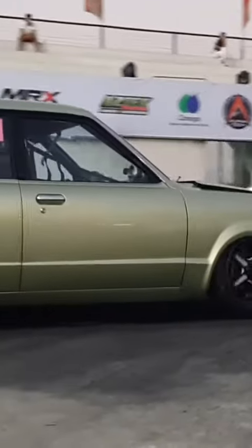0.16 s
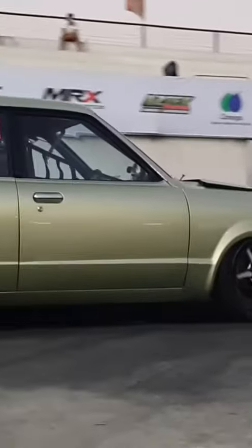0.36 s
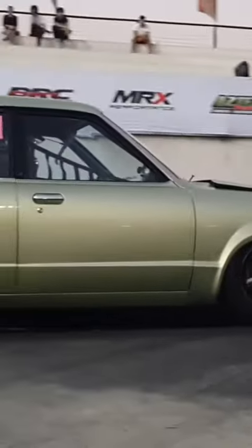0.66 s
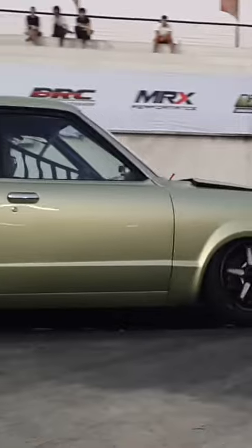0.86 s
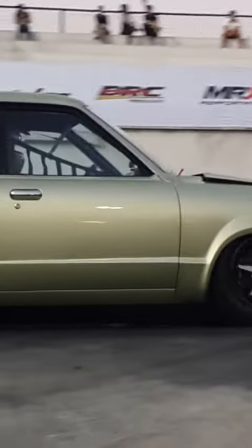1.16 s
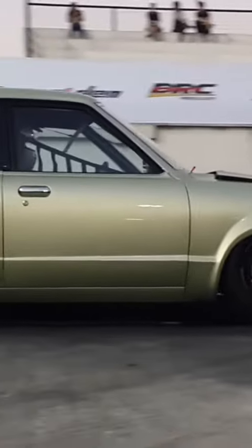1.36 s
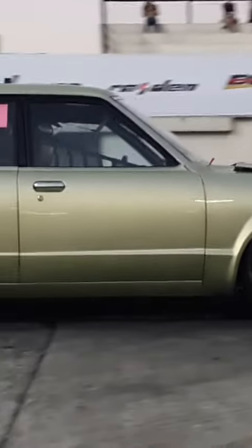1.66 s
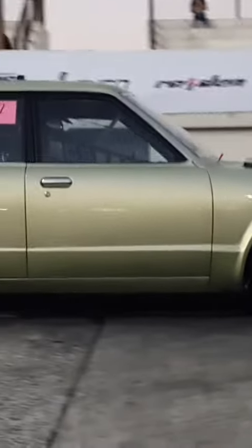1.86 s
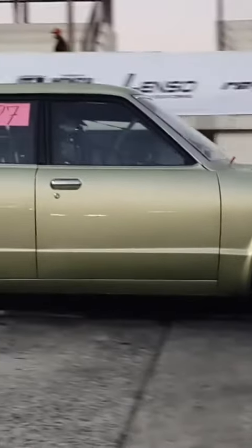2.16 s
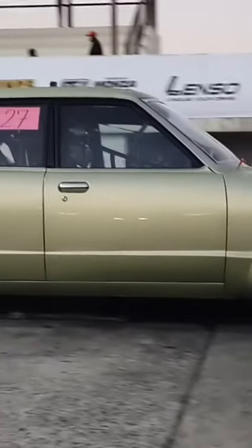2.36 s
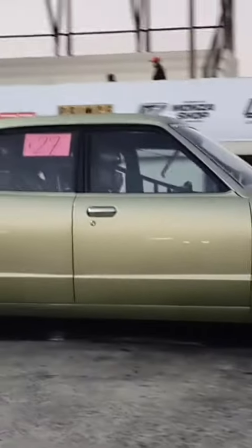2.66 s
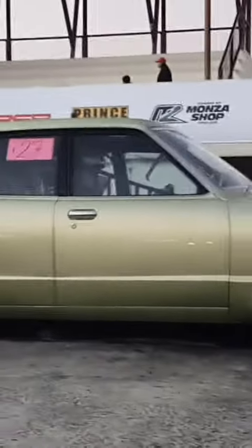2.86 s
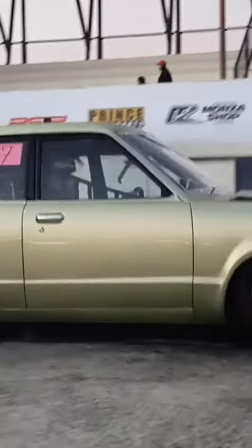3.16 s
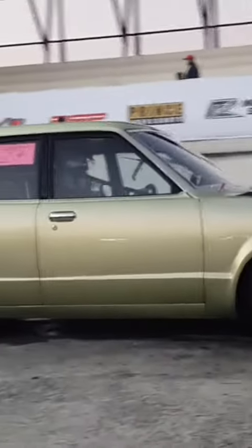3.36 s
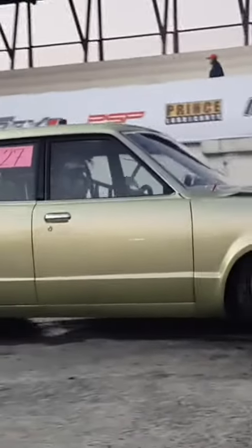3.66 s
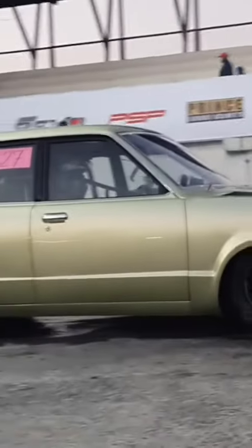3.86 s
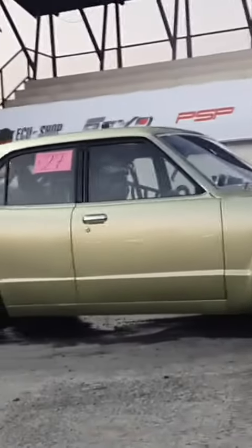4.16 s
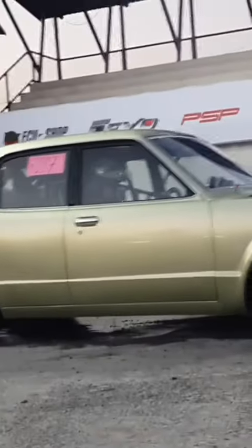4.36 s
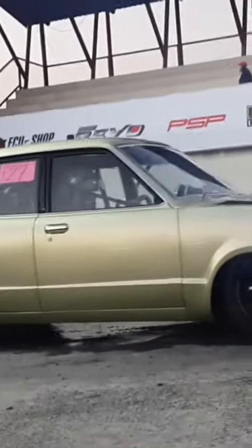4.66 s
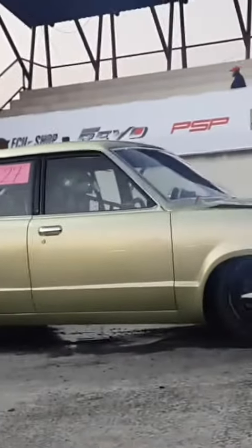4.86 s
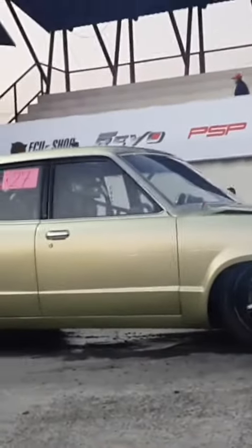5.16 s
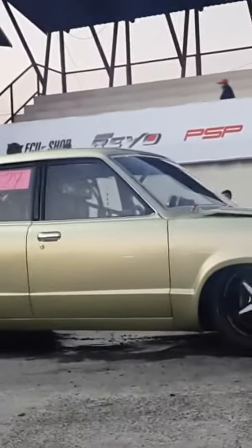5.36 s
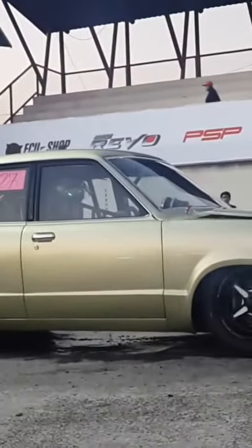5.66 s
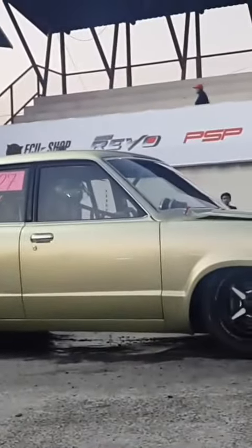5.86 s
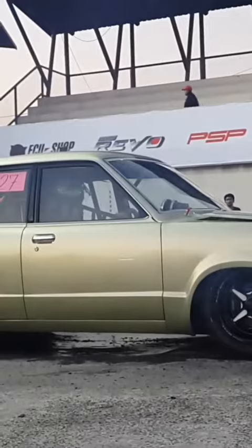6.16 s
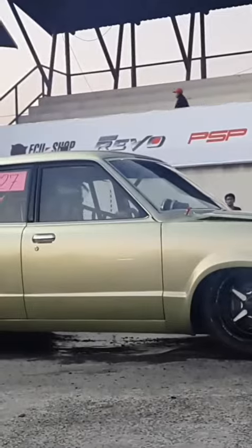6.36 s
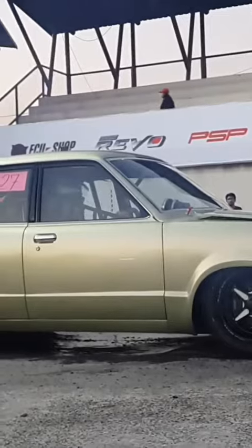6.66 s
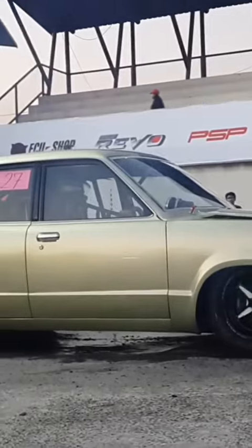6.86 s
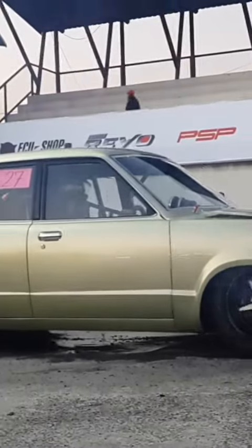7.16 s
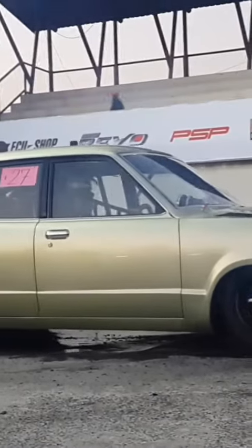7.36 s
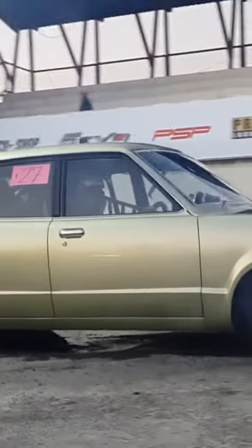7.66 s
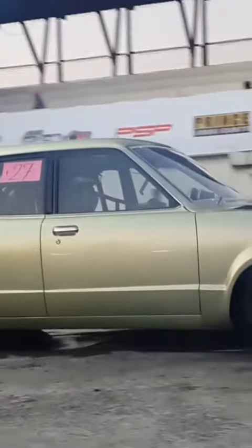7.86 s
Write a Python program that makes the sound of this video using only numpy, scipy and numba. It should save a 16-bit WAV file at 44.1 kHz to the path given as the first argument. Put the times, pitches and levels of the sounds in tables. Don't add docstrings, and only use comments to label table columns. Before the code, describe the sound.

A lumpy rotary race engine idles in pulsing bursts of hissy pops, stutters faster mid-way, then gets three sharp throttle blips near the end.

```python
import sys
import numpy as np
from scipy import signal
from scipy.fft import rfft, irfft, next_fast_len
from scipy.io import wavfile
from scipy.ndimage import uniform_filter1d, map_coordinates
from numba import njit

SR = 44100
rng = np.random.default_rng(int(sys.argv[2]) if len(sys.argv) > 2 else 0)


def gain_from_decibels(decibels):
    exponent = np.asarray(decibels, float) / 20
    return 10 ** exponent


def to_wav(sig):
    pcm = np.clip(np.atleast_2d(sig), -1, 1) * 32767
    pcm = np.round(pcm).astype(np.int16)
    wavfile.write(sys.argv[1], SR, pcm.T)


N = 352797
IDLE_HZ = 54


def colour(x, points):
    hz, db = np.transpose(points)
    f = np.maximum(np.arange(len(x) // 2 + 1) * SR / len(x), 1)
    gain = gain_from_decibels(np.interp(np.log(f), np.log(hz), db, left=-90, right=-90))
    return irfft(rfft(x) * gain, len(x))


def noise(points):
    x = colour(rng.standard_normal(next_fast_len(N)), points)[:N]
    return x / np.std(x)


def clicks(s, size):
    at = np.clip(s * SR, 0, N)
    i = at.astype(int)
    early = np.bincount(i, size * (1 - at + i), N + 2)
    late = np.bincount(i + 1, size * (at - i), N + 2)
    return (early + late)[:N]


def swell(x, rise_s, fall_s):
    t = np.arange(int(8 * fall_s * SR)) / SR
    shape = (1 - np.exp(-t / rise_s)) ** 2 * np.exp(-t / fall_s)
    return signal.fftconvolve(x, shape / shape.max())[:N]


def bump(x, width_ms):
    t = np.arange(-200, 201) / SR
    return signal.fftconvolve(x, np.exp(-.5 * (1000 * t / width_ms) ** 2), mode="same")


@njit
def ring(x, hz, t60):
    y, z, r = np.empty(len(x)), 0j, np.exp(-np.log(1000) / (t60 * SR))
    for i in range(len(x)):
        z = z * r * np.exp(2j * np.pi * hz[i] / SR) + x[i]
        y[i] = z.imag
    return y


@njit
def follow(x, attack, release):
    y, e = np.empty(len(x)), .1
    for i in range(len(x)):
        e += (x[i] - e) * (attack if x[i] > e else release)
        y[i] = e
    return y


def track():
    # frequency in Hz, level in dB per Hz.
    murmur = [(20, -30), (60, -8.5), (200, 0), (600, -20), (1300, -18), (2400, -26), (3500, -35.5),
              (7000, -28), (12000, -34.5), (13400, -41)]
    sway = gain_from_decibels(4.6 * noise([(.5, -11), (8, -13.5), (30, 7)]))
    mid = noise(murmur)
    side = colour(np.r_[noise(murmur), 0], [(20, -59), (500, -50), (2000, 3.0), (14000, 2.0)])[:N]
    return gain_from_decibels(-33.5) * sway * np.array([mid + side, mid - side])


def wind():
    return gain_from_decibels(-49.0) * np.array([noise([(15, 12), (40, 14.0), (120, -37.0), (300, -30)]) for _ in range(2)])


def octaves(s):
    return np.log2(np.maximum(1 / np.gradient(s) / IDLE_HZ, 1))


def chambers():
    # first firing in seconds, lone firings before, run, lone firings after, chambers of rest.
    lope = [(0.0115, 0, 0, 0, 1), (0.0318, 0, 6, 0, 6), (0.2664, 0, 6, 0, 6), (0.4996, 0, 5, 0, 7),
            (0.7368, 0, 6, 0, 6), (0.9696, 0, 6, 0, 6), (1.1933, 1, 4, 1, 4), (1.4105, 1, 6, 0, 7),
            (1.6789, 0, 2, 0, 1), (1.7342, 0, 3, 0, 6), (1.8955, 1, 4, 0, 6), (2.1192, 0, 6, 0, 8),
            (2.3734, 0, 6, 0, 7), (2.6024, 1, 2, 2, 4), (4.5138, 1, 4, 1, 4), (4.733, 1, 5, 0, 6),
            (4.9624, 2, 2, 2, 4), (5.2195, 1, 3, 1, 6), (5.4589, 1, 2, 1, 6), (5.6853, 0, 4, 1, 6),
            (5.9069, 1, 2, 2, 6), (6.1681, 1, 4, 1, 8), (6.4632, 0, 6, 0, 7)]
    stutter = [(2.815, 2, 2, 2, 2), (3.0344, 3, 2, 2, 2), (3.2899, 1, 1, 0, 2), (3.3798, 2, 2, 2, 2),
               (3.5961, 2, 2, 2, 2), (3.8115, 1, 1, 0, 2), (3.9005, 2, 2, 2, 2), (4.1191, 2, 1, 0, 2),
               (4.2507, 2, 2, 2, 4)]
    blips = [
        (6.6942, 0, 9, 0, 0),
        (6.84, 0, 10, 0, 15),
        (7.1902, 1, 9, 0, 0),
        (7.3665, 0, 11, 0, 16),
        (7.7182, 0, 9, 0, 0),
        (7.8484, 0, 13, 0, 0),
        (7.9966, 0, 1, 0, 0),
    ]
    beats = sorted(lope + stutter + blips)
    bars = []
    for _, lone_before, run, lone_after, rest in beats:
        bars.append([1, 0] * lone_before + [1] * run + [0, 1] * lone_after + [0] * rest)
    lit = np.concatenate(bars).astype(bool)
    first = np.cumsum([0] + [len(b) for b in bars[:-1]])
    blipped = np.arange(len(lit)) >= first[-len(blips)]
    gain = np.where(blipped, .0235, 0.01151)
    loss = np.where(blipped, .029, 0.01394)
    period = np.exp(np.cumsum(np.where(lit, -gain, loss)))
    turn = np.cumsum(period) - period
    return np.interp(turn, turn[first], [b[0] for b in beats]), lit


def strength(s, lit):
    # time in seconds, blast change in dB, hiss change in dB.
    mixture = [(0, -1.1, 3.1), (1.1, .2, 0), (1.7, 3, 0.5), (2.4, 0.4, -1), (3.2, 0.6, -1),
               (4.3, 0.2, -0.9), (5.3, -0.6, 1.4), (6.3, -0.1, -.6), (7, 1.2, .2), (8, 1, -0.9)]
    # time in seconds, blast change in dB, hiss change in dB.
    odd_charges = [(1.319, -7.5, 4.5), (1.4105, -3, -0.5), (2.7249, 2.5, 2.5), (2.945, -7.5, 0.5),
                   (3.0344, -4, 2.5), (3.2899, 2, 1.5), (3.4159, -3.5, 3.5), (3.5417, -3, -1),
                   (3.8115, 1.5, 2.5), (3.8466, -3, 6), (3.9005, -6, -5), (3.9366, 2, -2),
                   (4.1191, -1.5, -3.5), (4.1568, -1.5, -1.5), (4.2882, -2.5, 4), (4.6418, 2, -7.5),
                   (4.733, -12.5, -13), (5.0888, -1, 0), (5.1282, -6, -2), (5.4589, 3.5, 2.5),
                   (5.7778, 1.5, -2), (5.9069, -2.5, -0.5), (3.1995, 2, 2), (7.7182, -5.5, -2)]
    before, after = np.r_[False, lit[:-1]], np.r_[lit[1:], True]
    lone, octave = lit & ~before & ~after, octaves(s)
    at, rich_db, breath_db = np.transpose(mixture)
    blast_db = -2.5 + 3 * lone + 12 * octave + np.interp(s, at, rich_db)
    blast_db += 2 * (~before & after)
    hiss_db = -13.5 + 0.06 * lone - 3 * octave + np.interp(s, at, breath_db)
    odd = [np.argmin(np.abs(s - row[0])) for row in odd_charges]
    blast_db[odd] += np.transpose(odd_charges)[1]
    hiss_db[odd] += np.transpose(odd_charges)[2]
    rest = np.cumsum(lit)
    misses = (np.bincount(rest) - 1)[rest]
    blast_db += .6 * (np.r_[0, misses[:-1]] > 3) * ~before
    pump_db = np.select([misses == 1, misses == 2], [-46, -31], -23) + 15.5 * octave
    return blast_db, hiss_db, pump_db


def exhaust(s, lit, blast_db, pump_db, bounce_db, low_db, high_db, swing):
    # frequency in Hz, level in dB, t60 in seconds, path delay in ms.
    resonances = [(150.5, -9, 0.093, 3.06), (85.4, -32, 0.18, 1.6), (220.4, -28.5, 0.071, 2.62),
                  (304.6, -17, 0.022, 2.35), (398, -17.5, 0.033, 1.67), (596, -13, 0.064, 2.98),
                  (996, -17, 0.019, 1.936), (1120, -26, 0.012, 1.74), (1458, -19, 0.026, 1.963),
                  (1780, -24, 0.031, 2.4)]
    before_swing_db = [.5, 17, 2, 5, 11, -3, -1.5, 10, 3.5, 11]
    fire_scatter_db, pump_scatter_db, ring_scatter_db, pitch_scatter = 1.9, 1.9, 2.03, 0.0089
    chance = rng.standard_normal((len(s), 2 * len(resonances) + 2)).T
    fire_db = blast_db + fire_scatter_db * chance[0]
    size = gain_from_decibels(np.where(lit, fire_db, pump_db + 8 + pump_scatter_db * chance[1]))
    t = np.arange(N) / SR
    heat = (np.interp(t, s, 1 / np.gradient(s)) / IDLE_HZ) ** 0.2
    current = np.clip(np.searchsorted(s, t) - 1, 0, None)

    push_ms, pull_ms, pull_delay_ms, pull_db, bounce_ms = 0.26, 0.47, 0.94, -1.5, 1.24
    puff = size * np.where(lit, gain_from_decibels(-0.5), gain_from_decibels(-3.5))

    def with_bounce(ms):
        direct = clicks(s + ms / 1000, puff)
        return direct + clicks(s + (ms + bounce_ms) / 1000, puff * gain_from_decibels(bounce_db))

    out = bump(with_bounce(0), push_ms) - gain_from_decibels(pull_db) * bump(with_bounce(pull_delay_ms), pull_ms)
    for k, (hz, db, t60, ms) in enumerate(resonances):
        db = db + ring_scatter_db * chance[2 + 2 * k]
        db = db + low_db * (200 < hz < 350) + high_db * (800 < hz < 1300)
        db = db - 2.5 * np.log2(max(hz / 150, 1)) * ~lit
        db = db + before_swing_db[k] * (1 - swing)
        kick = uniform_filter1d(clicks(s + ms / 1000, size * gain_from_decibels(db)), size=11)
        if k == 0:
            unburnt = clicks(s, size * ~lit * gain_from_decibels(-8 * octaves(s)))
            kick += gain_from_decibels(-36.0) * swell(unburnt, 0.0033, 0.02) * rng.standard_normal(N)
        pitch = (1 + pitch_scatter * chance[3 + 2 * k])[current]
        out += ring(kick, hz * heat * pitch, 1. * t60)
    return out, size


def gas(s, lit, size, hiss_db, tilt_db):
    # frequency in Hz, level in dB per Hz.
    jet = [(1060, -0.5), (1800, -13), (2370, -10), (2860, -15.5), (3500, -17.5), (4240, -7.5),
           (4650, -12.5), (5230, -4), (5740, -3.5), (7260, 1), (8440, -4), (9660, -8), (12500, -3.5),
           (13400, -22)]
    # frequency in Hz, level in dB per Hz.
    rasp_colour = [(120, -18), (200, 2), (397, 7.5), (520, -2), (591, 1), (680, -0.5), (1470, -19.5),
                   (2600, -20.5), (3380, -36), (5720, -120)]
    edges_hz = [1000, 2700, 4000, 5000, 6000, 7000, 8000, 9000, 10000, 11500, 13600]
    rasp_db = -18.5
    burning = clicks(s + 0.00052, size * lit * gain_from_decibels(-3.5 * octaves(s)))
    rasp = gain_from_decibels(rasp_db) * swell(burning, 0.0002, 0.018)
    rasp += gain_from_decibels(rasp_db - 5) * swell(clicks(s, size * ~lit), 0.0033, 0.028)

    grit = [(150, -26.5), (900, 14.5), (2000, -26)]
    jets = np.array([noise(jet) * gain_from_decibels(3.33 * noise(grit)) for _ in range(3)])
    size_fft = next_fast_len(N)
    spectrum = rfft(jets, size_fft)
    f = np.arange(size_fft // 2 + 1) * SR / size_fft
    patch_db = 3.45 * rng.standard_normal((len(s), len(edges_hz))).T
    out = rasp * np.array([noise(rasp_colour) * gain_from_decibels(db) for db in (-1.5, -9, -9)])
    for k, (lo, hi) in enumerate(zip(edges_hz, edges_hz[1:])):
        lean_db = tilt_db[0] * (4000 <= lo < 6000) + tilt_db[1] * (8000 <= lo < 10000)
        lean_db = lean_db + tilt_db[2] * (lo >= 10000)
        shots = clicks(s + 0.00008, size * lit * gain_from_decibels(hiss_db + patch_db[k] + lean_db))
        flow = swell(shots, 0.0014, 0.0083) + gain_from_decibels(-33.5) * swell(shots, 0.00062, 0.032)
        band = irfft(spectrum * ((f >= lo) & (f < hi)), size_fft)[:, :N]
        out += flow * band * gain_from_decibels(np.array([[-4.5], [-3.5], [-3.5]]))
    return out


def wall(x):
    t60_s, gap_s, level_db = 0.51, 0.0097, -13.5
    t = np.arange(int(.6 * SR)) / SR
    tail = (t > gap_s) * np.exp(-np.log(1000) * t / t60_s)
    mid = noise([(40, 7.0), (300, 10.5), (1500, -35), (5000, -31.0), (14000, 4.5)])
    apart = [(40, -37.0), (300, 7.5), (1500, 20), (5000, 18), (14000, 2)]
    out = []
    for _ in range(2):
        side = colour(rng.standard_normal(N + 1), apart)[:N]
        echo = tail * (mid + side)[:len(t)]
        out.append(signal.fftconvolve(x, echo / np.sqrt(np.sum(echo ** 2)))[:N])
    return np.array(out) * gain_from_decibels(level_db)


def scene():
    # time in seconds, swing past the phone 0-1, tailpipe turned towards it 0-1.
    roll_past = [(0, 0.01, 0.48), (1, 0.27, 0.4), (2, 0.67, 0.25), (3, 0.88, 0.04), (3.8, 0.88, 0.03),
                 (4.5, 0.98, 0.49), (5.2, .98, 0.65), (6.2, 0.95, 1), (7, 0.94, 0.84), (8, 1, 0.47)]
    # bounce off the ground, pipe tones 200-350
    # Hz, pipe tones near 1 kHz, hiss 4-6 kHz, hiss 8-10 kHz.
    ends_db = [(-1.5, -9), (-47, 12), (14, 5), (-7, 1.5), (-0.8, -1)]
    s, lit = chambers()
    blast_db, hiss_db, pump_db = strength(s, lit)
    at, *shares = np.transpose(roll_past)
    swing, facing = (np.interp(s, at, c) for c in shares)
    bounce_db, low_db, high_db, *tilt_db = (a + swing * (b - a) for a, b in ends_db)
    tilt_db.append(-5 + facing * (2.5 + 5))
    low_db = low_db - 6 * octaves(s)
    pipe, size = exhaust(s, lit, blast_db, pump_db, bounce_db, low_db, high_db, swing)
    both, left, right = gas(s, lit, size, hiss_db, tilt_db)
    lag = np.interp(np.arange(N) / SR, s, 6.75 + facing * (3.2 - 6.75))
    late = map_coordinates(pipe, [np.arange(N) - lag], order=3)
    late = late + map_coordinates(both, [np.arange(N) - .33 * lag], order=3)
    car = np.array([late + left, pipe + both + right])
    return car + wall(car.mean(axis=0)) + track()


def thin(x, keep_db, sway_db):
    f, _, z = signal.stft(x, SR, nperseg=1024)
    power = np.abs(z) ** 2
    hiss = power[:, (f > 4500) & (f < 13000)].mean(axis=(0, 1))
    sway = uniform_filter1d(rng.standard_normal((33, z.shape[2])), size=4) * 2
    wander_db = sway_db * np.repeat(sway, 16, axis=0)[:len(f)]
    notch_db = 3 * (np.abs(f - 3500) < 700)[:, None]
    limit = hiss * gain_from_decibels(2 * (keep_db + wander_db + notch_db))
    weak = (uniform_filter1d(power, size=11, axis=1) < limit) & (f > 2200)[:, None]
    return signal.istft(z * np.where(weak, .03, 1), SR, nperseg=1024)[1][:, :N]


def band_limit(x):
    return signal.sosfilt(signal.butter(12, 14290, fs=SR, output="sos"), x)


def record(dry):
    # frequency in Hz, left minus right level in dB.
    ports = [(60, 0.0), (110, 0.0), (200, 0.5), (370, -0.5), (670, 0.0), (1230, 0.5), (2240, 1.0),
             (4100, 1.5), (7490, 0.5), (13700, -3.0)]
    hz, db = np.transpose([(1, 0)] + ports + [(SR / 2, ports[-1][1])])
    x = np.array([colour(np.r_[v, 0], np.c_[hz, side * db / 2])[:N] for v, side in zip(dry, (1, -1))])
    x = signal.sosfilt(signal.butter(4, 78, "high", fs=SR, output="sos"), x) + wind()
    ahead = int(0.0058 * SR)
    peak = np.r_[np.abs(x).max(axis=0)[ahead:], np.zeros(ahead)]
    envelope = follow(peak, 1 / (0.0039 * SR), 1 / (0.049 * SR))
    x = x * np.minimum(1, gain_from_decibels(-12.0) / envelope) ** 0.49 * gain_from_decibels(1.5)
    x = signal.sosfilt(signal.ellip(8, .2, 60, 13300, fs=SR, output="sos"), x)
    x = thin(np.clip(x, -1, 1), keep_db=-9.0, sway_db=5.5)
    return band_limit(np.clip(x, -1, 1))


dry = scene()
out = record(dry)
to_wav(out)
```